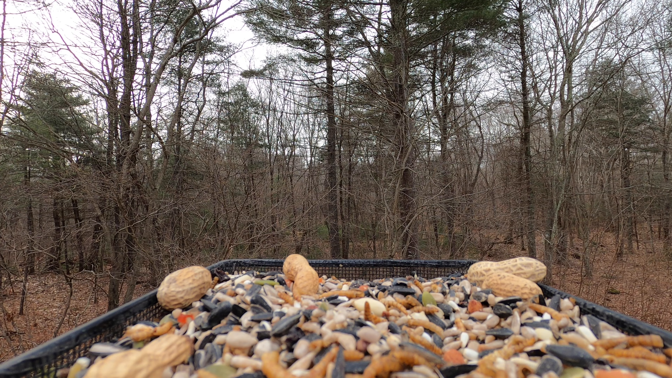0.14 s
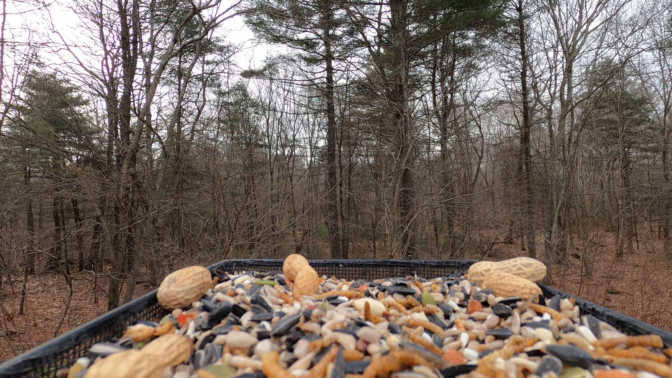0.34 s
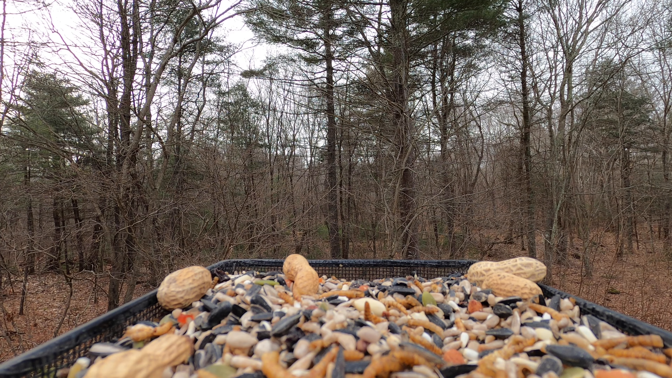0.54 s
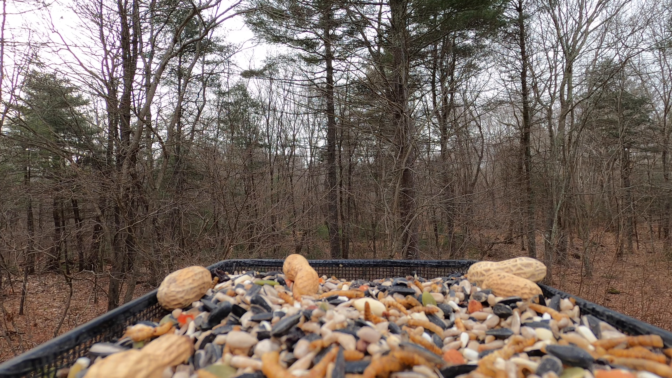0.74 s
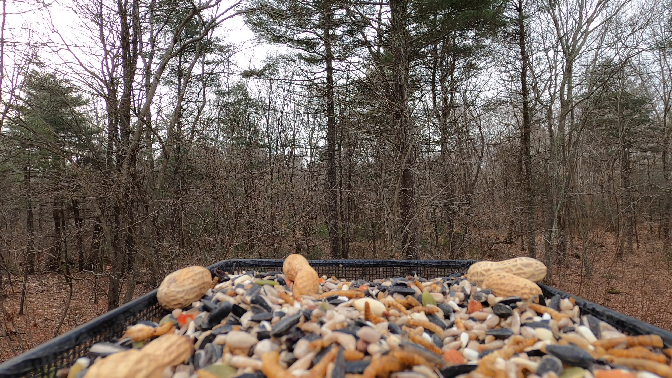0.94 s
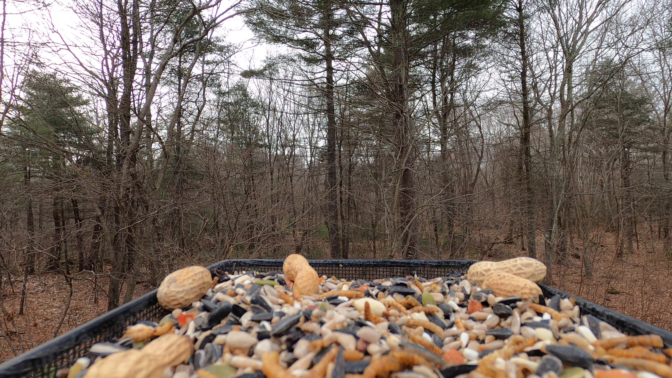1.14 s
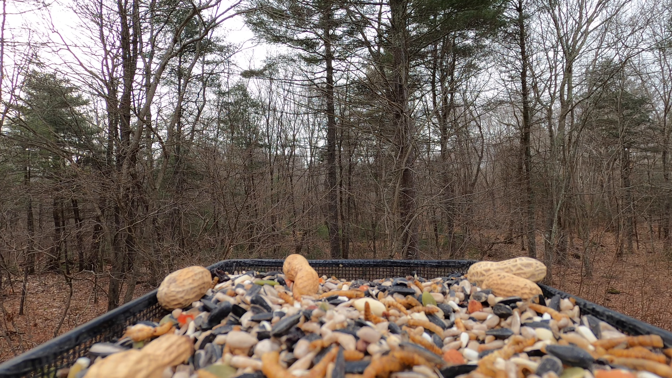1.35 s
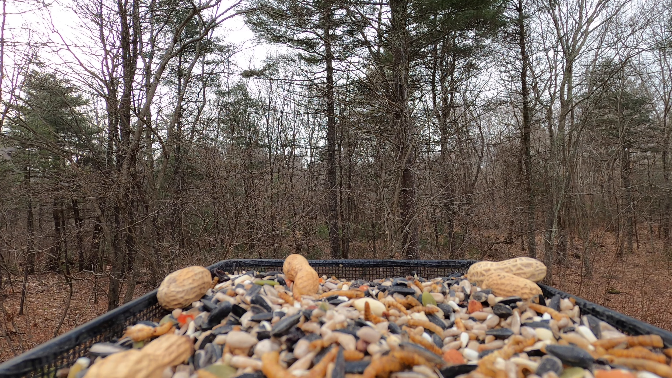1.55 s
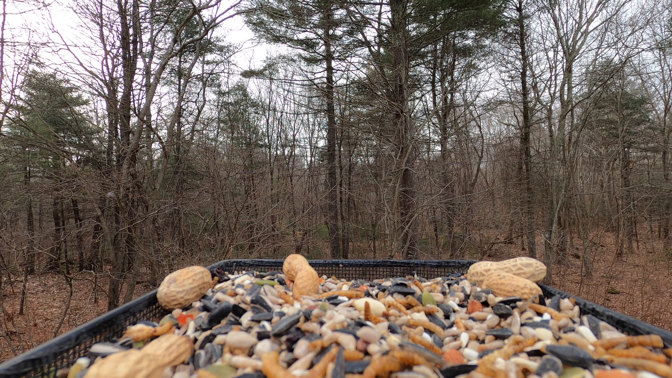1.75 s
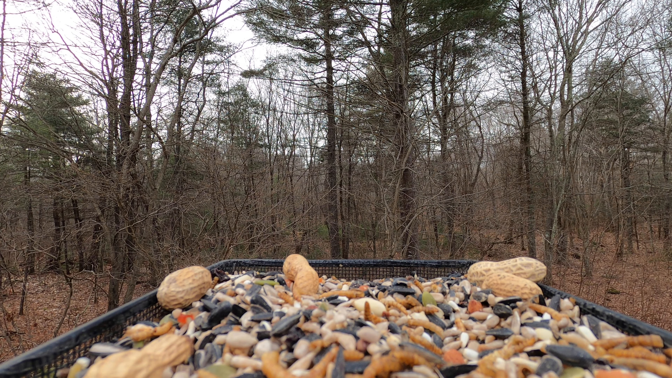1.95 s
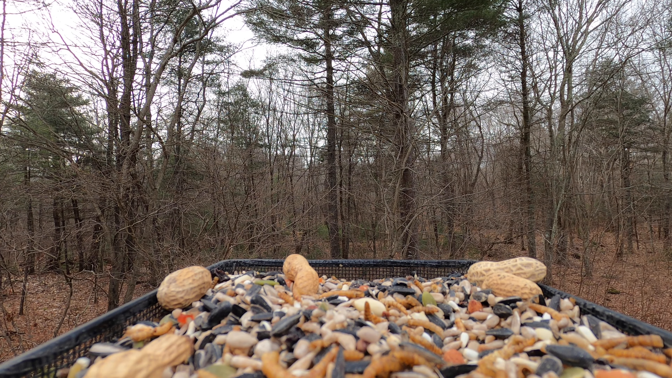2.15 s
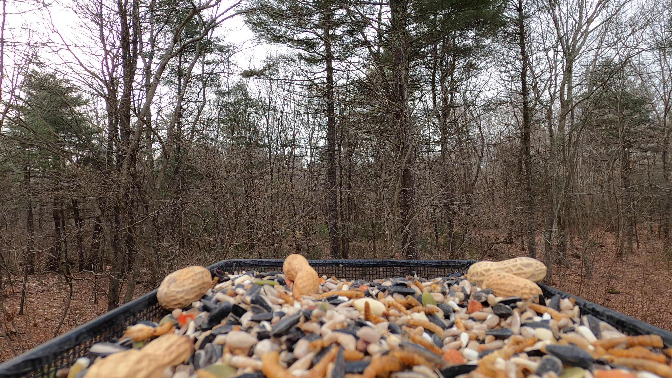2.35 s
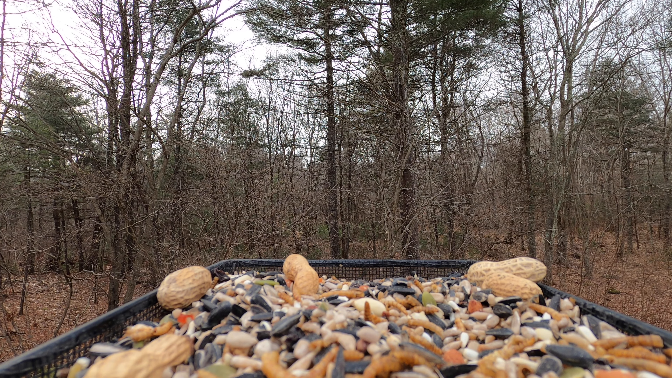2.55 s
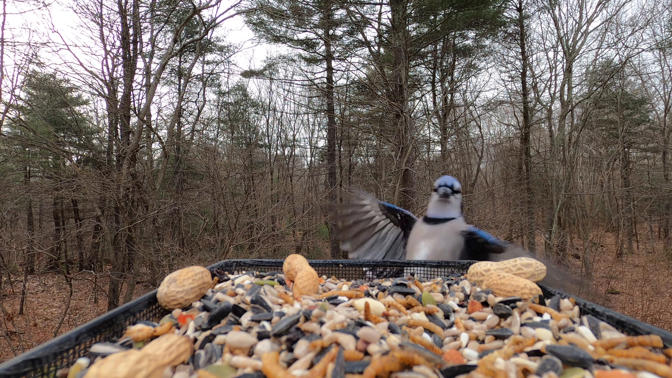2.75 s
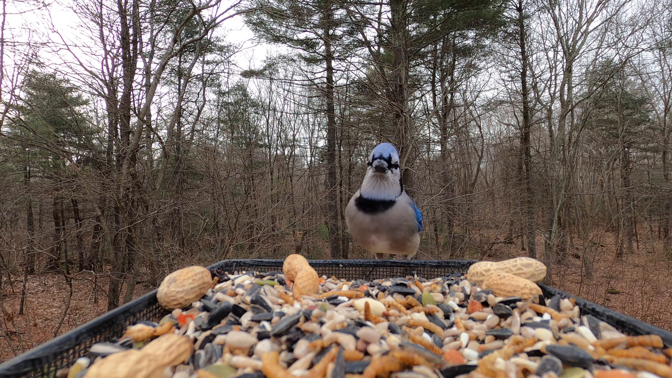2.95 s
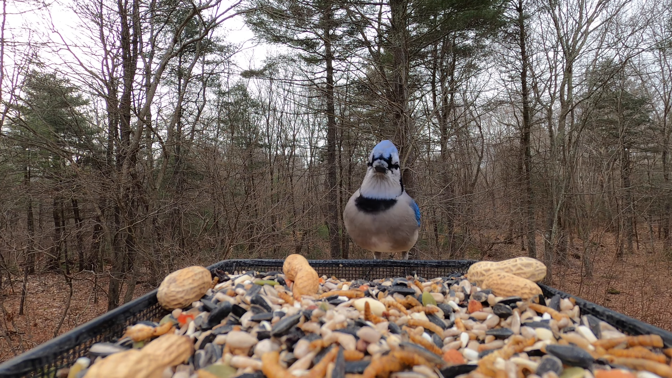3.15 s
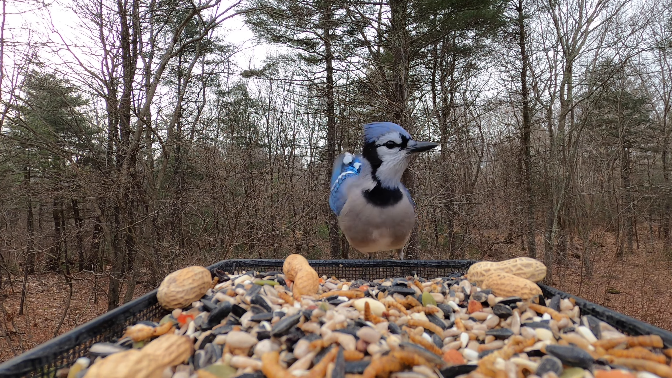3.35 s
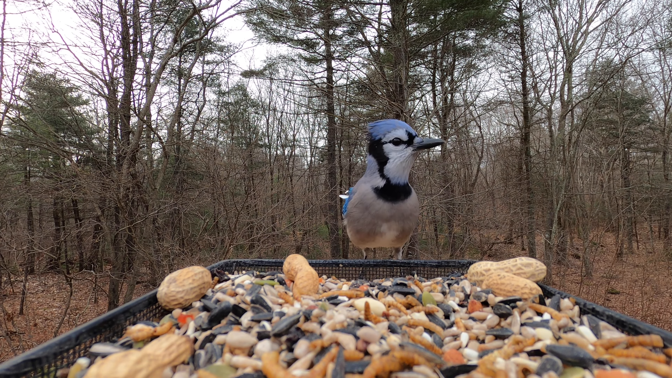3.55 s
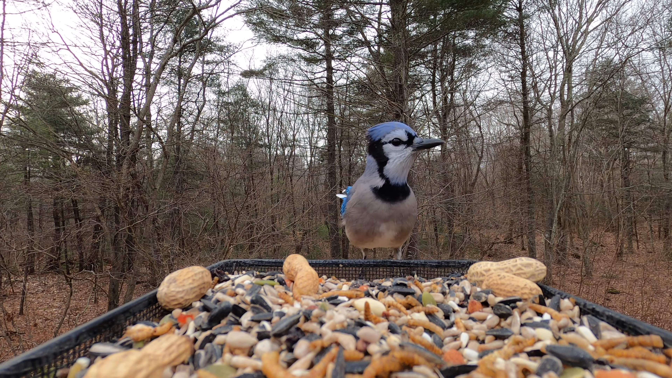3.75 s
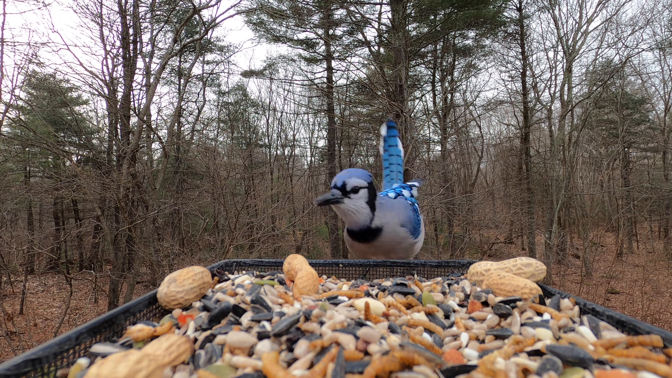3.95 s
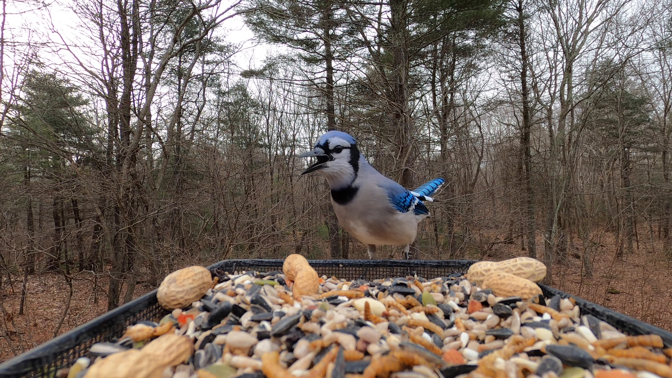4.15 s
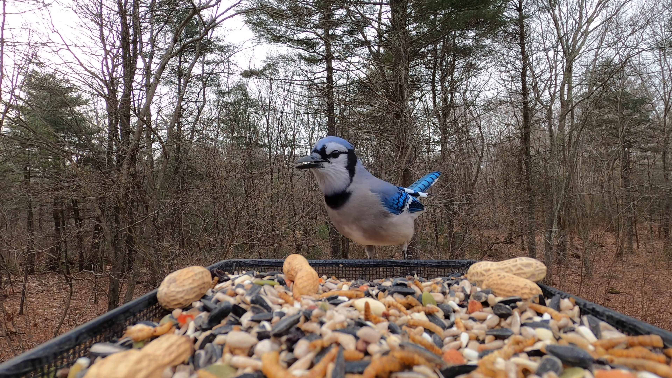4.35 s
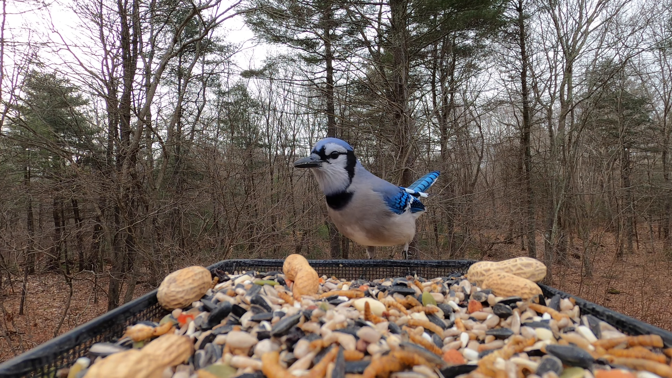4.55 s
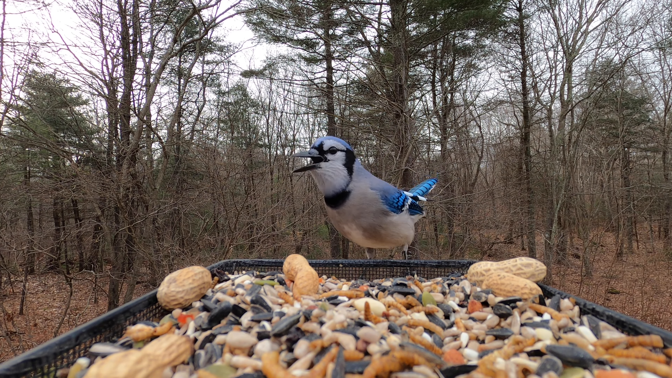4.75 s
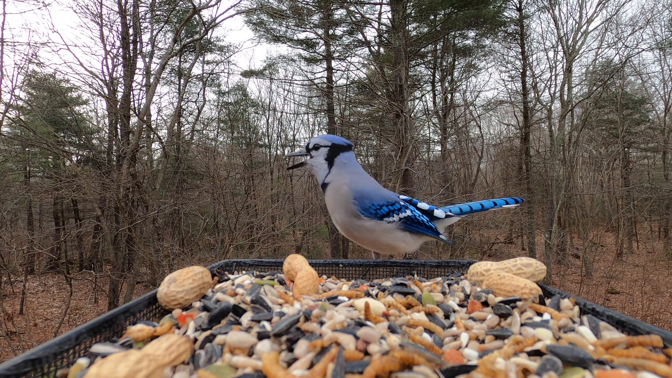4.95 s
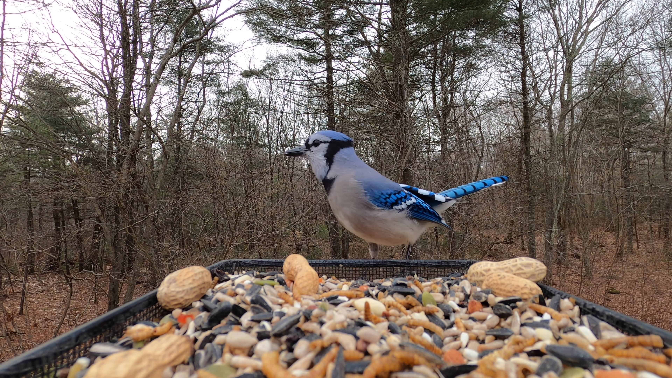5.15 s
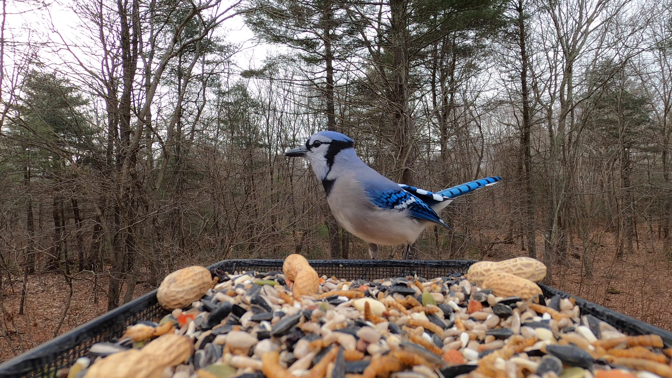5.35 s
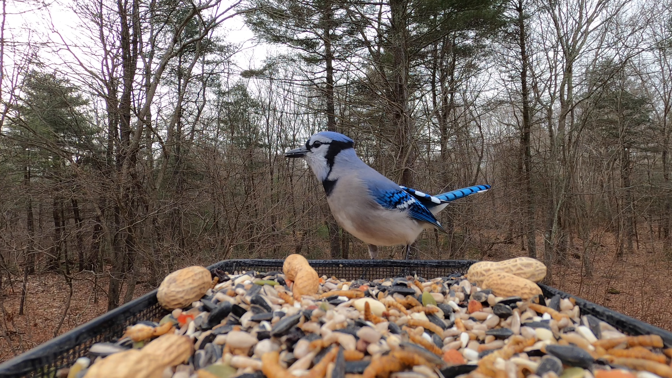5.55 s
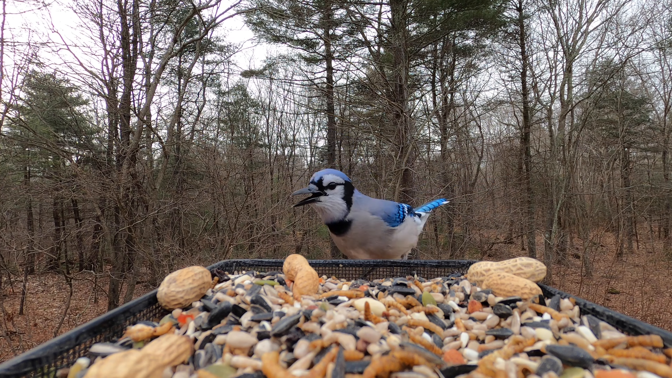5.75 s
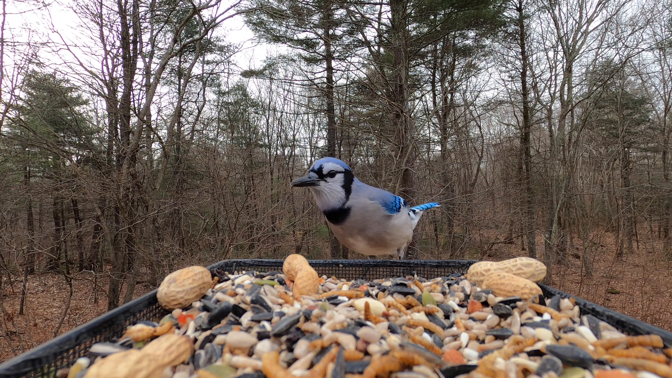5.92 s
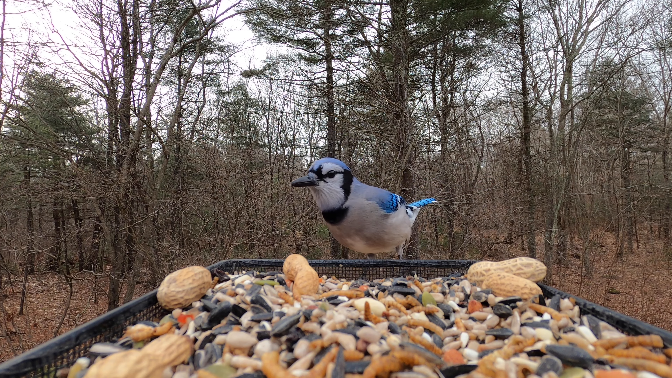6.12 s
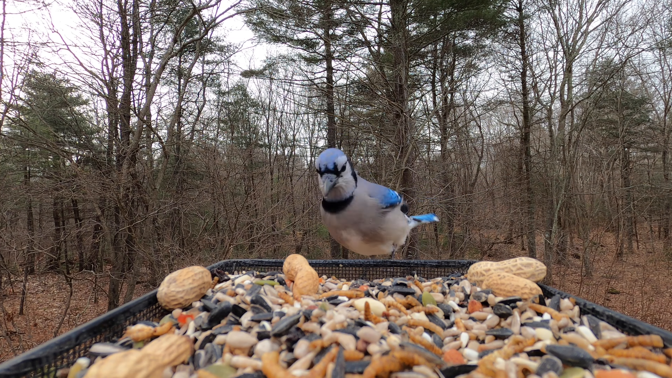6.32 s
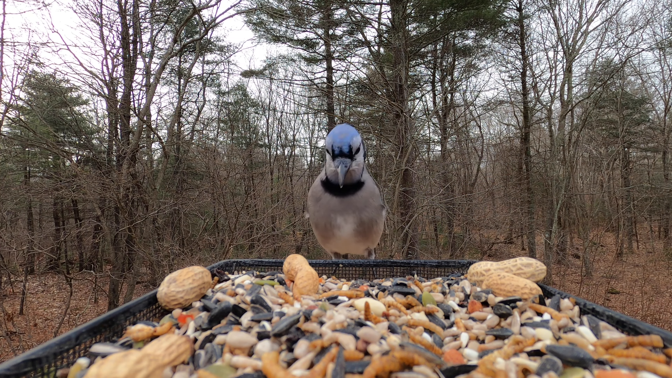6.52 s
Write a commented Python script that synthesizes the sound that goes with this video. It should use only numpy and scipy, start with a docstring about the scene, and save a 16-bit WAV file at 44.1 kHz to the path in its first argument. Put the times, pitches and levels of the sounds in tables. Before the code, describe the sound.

The scene opens in quiet woods: soft airy hush, low puffs of wind, faint leaf stirs and a distant engine idling as a low throbbing hum. A barely audible chirp comes at 0.8 s, a very thin high note at 1.1, then four quick, sharp high chirps from 1.9 to 2.25, slightly left. Around 2.55 wings approach softly; at 2.8 the jay lands with a burst of feather flutter, a dull thud and rattling claws and seeds, settling by 3.0. Dry wing flicks follow at 3.4 and 3.95. At 4.1, 4.8 and 5.7 it gives three explosive calls, each about a quarter second: raspy upward croak, short piercing whistle, harsh arched jeer, with a faint scattered echo from the trees. Small claw taps and soft flicks occur between them. At 6.4 the feathers rustle again with light taps and a faint chirp over the low hum.

```python
"""Soft woodland air, puffs of wind and a far idling engine open the scene; thin chirps follow from the trees.
A jay lands on a seed tray, flicks its wings and gives three loud calls: rasping rise, whistle, arched jeer.
Its voice is a sum of harmonics coloured by the throat, shaken and mixed with hiss where it is rough.
The tray is a set of decaying modes; wings, leaves and wind are shaped noise; the engine is a row of orders.
Scattered echoes answer the birds, and a gain control ducks under the loud sound."""
import sys
import numpy as np
from scipy import signal
from scipy.fft import rfft, irfft
from scipy.io import wavfile
from scipy.ndimage import uniform_filter1d

SR = 44100
rng = np.random.default_rng(int(sys.argv[2]) if len(sys.argv) > 2 else 0)


def generate_wav(signal):
    """Clip the signal to [-1, 1] and save it as 16-bit WAV at the path in sys.argv[1]."""
    frames = np.transpose(np.atleast_2d(signal))
    scaled = np.clip(frames, -1, 1) * 32767
    pcm = np.round(scaled).astype(np.int16)
    wavfile.write(sys.argv[1], SR, pcm)


N = 294588
TIME = np.arange(N) / SR
FREQS = np.fft.rfftfreq(N, 1 / SR)

# Rasping rise that opens each call. Each row: start in s, length in s, top pitch in Hz, full level in dB.
RISES = [(4.12, .079, 1485, -10.5), (4.797, 0.071, 1520, -8.5), (5.679, .069, 1491, -11)]
# Whistle in the middle of each call. Each row: start in s, length in s, pitch in Hz,
# sag as a share of the pitch, level in dB, opening accent in dB.
WHISTLES = [(4.197, 0.069, 2390, .02, -12, 3), (4.865, .070, 2385, .04, -18.5, 10),
            (5.745, .073, 2356, 0.055, -18.5, 7.5)]
# Arched jeer that ends each call. Each row: start in s, length in s, top pitch in Hz,
# sag as a share of the pitch, level in dB, fade over the note in dB.
JEERS = [(4.267, .100, 1250, -.005, -12, -3), (4.936, 0.1, 1250, 0.031, -9.5, 2.5),
         (5.82, 0.1, 1218, .015, -12, -0.5)]
# Throat and beak resonance in each note. Each row: frequency in Hz, relative level in dB.
RISE_COLOUR = [(500, -7.5), (1000, -6.5), (1450, -2.5), (1850, 7), (2300, -9), (2900, -3.5), (3400, -12),
               (4200, 0), (5800, -7), (7100, -18), (8600, -22.5), (10200, -32), (11200, -46),
               (15000, -52.5)]
WHISTLE_COLOUR = [(1800, -5.5), (2400, -9.5), (4100, -2.5), (4750, 2), (6000, -8.5), (7100, -12),
                  (9400, -30.5), (11800, -44.5), (15000, -56.5)]
JEER_COLOUR = [(850, -9), (1220, -1.5), (1900, -4), (2420, 2), (3100, -22), (3700, -3.5), (4900, -1.5),
               (6100, -4.5), (7300, -18), (8600, -20), (9800, -32), (11000, -38), (12300, -36.5),
               (15000, -53.5)]
# Turbulence in the throat. Each row: frequency in Hz, relative level in dB.
RASP_COLOUR = [(500, -25.5), (1500, -5), (3000, -14), (4400, 9), (5800, 1), (8500, -5), (10500, -25.5),
               (15000, -31)]
# Left-over-right level of the jay's position. Each row: frequency in Hz, difference in dB.
JAY_BALANCE = [(700, -2), (2400, 0), (4400, -3), (6000, 0.5), (7400, -2), (9000, -4.5), (15000, -7.5)]
# Lag of the left ear behind the right. Each row: frequency in Hz, phase in radians.
JAY_LAG = [(300, 0.94), (1200, 0.42), (2400, .62), (4600, 0.97), (6000, 1.4), (7200, 1.5), (8700, 0.85),
           (15000, 1.3)]

# Claws on the tray. Each row: time in s, relative level in dB,
# brightness (tilt of the modes in dB per decade, and gain of the crunch in dB).
CLAW_TAPS = [(2.7757, -21, 5.5), (2.7785, -17, 1.5), (2.7848, -17.5, 2), (2.7935, -20.5, 3.5),
             (2.803, -29, -3), (2.824, -34.5, 7), (2.8384, -24.5, -14.5), (2.8609, -22, -12.5),
             (2.8702, -23.5, 4), (2.92, -30.5, -18), (2.9382, -33.5, -8.5), (2.9543, -27, 9.5),
             (4.217, -24, 4), (4.223, -27, 3.5), (5.116, -29.5, -1), (5.141, -35, -11), (5.764, -29.5, 6),
             (6.401, -34, 7), (6.454, -32.5, 10.5)]
# Modes of the tray. Each row: frequency in Hz, relative level in dB, 60 dB decay time in s.
TRAY_MODES = [(230, -19.5, 0.32), (610, -12, .03), (930, -14, 0.025), (1360, 5, 0.02), (1790, -1, 0.028),
              (2180, -6, 0.0081), (2630, -1.5, .012), (2890, -8.5, 0.0088), (3600, -4, .01),
              (3750, -15, .01), (5750, -9, .006), (6450, -9.5, 0.0057)]
# Crunch of seed, then flexing of the tray. Each row: frequency in Hz, relative level in dB.
CRUNCH_COLOUR = [(200, -4.5), (700, -9.5), (1400, -1), (2800, 6.5), (6500, -3.5), (9000, -17.5),
                 (15000, -32)]
THUD_COLOUR = [(120, -12), (250, 0), (600, -2.5), (1200, -6), (2000, -25), (15000, -65.5)]
# Wing strokes of the landing. Each row: middle in s, half length in s,
# level of swept air in dB, level of feather friction in dB.
WINGBEATS = [(2.55, 0.073, -57, -67.5), (2.667, .012, -54.5, -50), (2.733, 0.028, -56.5, -50.5),
             (2.79, 0.01, -38.5, -31.5), (2.845, .034, -44, -47), (2.949, 0.011, -51, -45.5)]
# The perched jay flicks its wings open and shut. Each row: start in s, time open in s,
# opening level in dB, shutting level in dB, level of swept air in dB.
FLICKS = [(3.38, .05, -44.5, -39.5, -64), (3.939, .06, -40.5, -46, -62.5), (5.116, .025, -52, -51.5, -57),
          (5.455, 0.024, -61, -58.5, -50.5), (6.404, .053, -45.5, -49, -43)]
# Feather friction, then swept air. Each row: frequency in Hz, relative level in dB.
FEATHER_COLOUR = [(150, 16), (600, -11), (1400, 2.5), (2200, -4), (3500, -5.5), (7000, -11.5),
                  (10000, -24.5), (15000, -45)]
WING_COLOUR = [(100, -21.5), (230, 10.5), (400, -5.5), (600, -13), (950, -13), (1350, -1.5), (1750, -6.5),
               (2200, -26.5), (5000, -45), (15000, -41)]

# Small birds, and a distant bird's thin note. Each row: start in s, length in s, top pitch in Hz,
# level in dB, left-over-right level in dB.
TSIPS = [(.788, 0.046, 7450, -58, 4), (1.888, .071, 7690, -44.5, 4.5), (1.994, 0.049, 7680, -41, 4.5),
         (2.098, 0.045, 7650, -44.5, 4.5), (2.192, 0.053, 7700, -44.5, 3.5), (6.447, 0.058, 7260, -58, 9)]
SEETS = [(1.112, .095, 8860, -49.5, -5.5)]
FAR_WHISTLES = [(0.0025, .19, 5940, -79, -3)]
# Their contours. Each row: share of the length, share of the top pitch, relative level in dB.
TSIP_SHAPE = [(0, .83, -16), (.15, .89, -1), (.47, .955, 0), (.78, 1, 0), (.87, .92, -9), (.94, .75, -17),
              (1, .6, -28)]
SEET_SHAPE = [(0, .94, -10), (.16, .98, 6), (.45, .965, -2), (.72, 1, 9.5), (0.851, .94, 9.5),
              (.92, 0.61, 5.5), (1, 0.14, -24)]
FAR_SHAPE = [(0, 1, 0), (.4, 1, -2), (1, .995, -8)]

# Distant leaves stir. Each row: middle in s, half length in s, level in dB.
LEAVES = [(.1, 0.027, -72), (.42, .012, -67), (.65, .2, -73.5), (.9, .007, -67), (.945, 0.0046, -64),
          (1.1, 0.097, -62.5), (1.6, 0.033, -65.5), (2.52, 0.12, -71.5)]
# Spectrum of the leaves. Each row: frequency in Hz, relative level in dB.
LEAF_COLOUR = [(1000, 9.5), (2500, -8), (4500, -1.5), (7000, -6.5), (10000, -19.5), (15000, -34)]
# Idling engine. Each row: multiple of the cycle rate, relative level in dB.
ENGINE_ORDERS = [(8, 0), (10, -13), (13, -11), (14, -10), (15, -8), (16, -7), (17, -14), (18, -16),
                 (20, -16), (22, -16), (25, -17), (26, -16), (29, -18), (34, -21)]
# Air of the woods. Each row: frequency in Hz, relative level in dB.
WOODS_COLOUR = [(12, 4), (40, 3.5), (90, -14.5), (130, -18.5), (200, -10), (310, -20.5), (500, -24),
                (780, -29.5), (1300, -28.5), (2000, -38), (3000, -45.5), (7000, -53), (9000, -61.5),
                (11000, -75.5), (15000, -69.5)]
# Breeze in the woods. Each row: time in s, relative level in dB.
BREEZE = [(0.0, -65.5), (0.41, -70), (0.64, -66), (2.0, -69.5), (2.25, -68.5)]
# Puffs of wind on the microphone. Each row: middle in s, half length in s, relative level in dB.
PUFFS = [(.15, 0.15, -41), (.8, 0.4, -45), (1.33, 0.075, -38.5), (2.8, 0.06, -49.5)]
# Spectrum of the puffs. Each row: frequency in Hz, relative level in dB.
PUFF_COLOUR = [(12, -5.5), (30, -3), (70, -2.5), (120, -13), (250, -25.5), (600, -62), (15000, -100)]

CROAK_FROM_HZ, CROAK_TO_HZ = 490, 944   # the rise starts as a low croak
UPPER_S = 0.046   # then flips to the upper register for this long
CLIMB_SHARE, CLIMB_S = .22, .017   # landing this far under its top pitch and closing in on it
SWELL_DB, SWELL_PAST_FLIP_S = 20, 0.0059   # the voice swells until just after the flip
PUSH_DB = 9   # and gains this much besides over the whole note
ACCENT_AT_S, ACCENT_WIDTH_S = 0.006, .012
JEER_SCOOP, JEER_SCOOP_S = .12, .009   # the jeer scoops up from this share below its pitch
JEER_DROP, JEER_DROP_S = .31, .011   # and falls away as the bird lets go
FULL_VOICE_DB = -11   # level from which the jay's voice is brightest
THROAT_SPREAD = 0.95   # the throat smears each pulse in time (radians)
CALM_FRAY = 0.0026   # phase wander of the second harmonic in the clear voice, steeper above (radians)
CUTOFF_HZ = 15700
CONTACT_S = .00015   # a claw needs this long to set the tray ringing
SEEDS_PER_TAP, SEED_DELAY_S, SEED_LOSS_DB = 2, .005, 11.5   # mean gap and loss from each seed to the next
THUD_LAG_S = 0.0046   # lag of the bending waves at 1 kHz; the lower, the slower
FLICK_HALF_S, SLIDE_DB = .005, -7.5   # snaps are short; the feathers slide more softly in between
NEAR_SIDE_DB, FAR_SIDE_DB = -10, -6   # opposed part of the stereo noise, near and far
CYCLE_HZ = 5.665   # mean engine cycle rate
ENGINE_SPREAD = .3   # phase offset at each ear (radians)
LIMIT_DB, LIMIT_SENSE_S, LIMIT_ATTACK_S, RECOVER_DB_PER_S = -18, 0.026, .006, 4.5   # gain control


def jay():
    """Register breaks: three kinds of note follow one another and overlap briefly at each break."""
    rise = jay_note([rise_contour(*row) for row in RISES], RISE_COLOUR,
                    jitter=0.012, flutter=0.27, flutter_hz=272.7, fray=0.65,
                    hiss_db=-16, calm_hiss_db=-31.5, half_db=-8.0, dulling=1.0)
    # the whistle holds its pitch fairly well even where it is rough
    whistle = jay_note([whistle_contour(*row) for row in WHISTLES], WHISTLE_COLOUR,
                       jitter=.035, flutter=.4, flutter_hz=436.6, fray=0.53,
                       hiss_db=-6, calm_hiss_db=-32.5, half_db=-23.5, dulling=.2)
    jeer = jay_note([jeer_contour(*row) for row in JEERS], JEER_COLOUR,
                    jitter=0.041, flutter=.25, flutter_hz=378, fray=0.69,
                    hiss_db=-7.5, calm_hiss_db=-47, half_db=-20.0, dulling=.9)
    return rise + whistle + jeer


def rise_contour(start, length, top_hz, level_db):
    """Register flip: a croak climbs, jumps up with a burst of rasp, then clears; rows of (s, Hz, dB, rasp)."""
    t = TIME[TIME < length]
    flip = length - UPPER_S
    croak = CROAK_FROM_HZ + (CROAK_TO_HZ - CROAK_FROM_HZ) * t / flip
    upper = top_hz * (1 - CLIMB_SHARE * np.exp(-(t - flip) / CLIMB_S))
    hz = np.where(t < flip, croak, upper)
    breaking = np.exp(-(length - t) / .004)
    swell_db = SWELL_DB * np.maximum(1 - t / (flip + SWELL_PAST_FLIP_S), 0)
    db = level_db - swell_db - PUSH_DB * (1 - t / length) - 4.5 * breaking
    burst = .5 * bump(t - flip, middle_s=0.011, width_s=0.0096)
    rasp = np.where(t < flip, .22, .09) + burst + 0.19 * breaking
    return np.column_stack([start + t, hz, db, rasp])


def whistle_contour(start, length, pitch_hz, sag, level_db, accent_db):
    """Unstable oscillation at the breaks: the voice starts accented and rough, sags, then collapses."""
    t = TIME[TIME < length]
    breaking, collapse = np.exp(-t / .0035), np.exp(-(length - t) / 0.0067)
    hz = pitch_hz * (1 - sag * t / length) * (1 - .2 * collapse + .025 * breaking)
    accent = accent_db * bump(t, ACCENT_AT_S, ACCENT_WIDTH_S)
    db = level_db + accent - 6 * breaking - 2.5 * collapse
    rasp = 0.037 + 0.33 * np.exp(-t / .011) + .7 * collapse
    return np.column_stack([start + t, hz, db, rasp])


def jeer_contour(start, length, top_hz, sag, level_db, fade_db):
    """Pitch and level arch together; the oscillation is clean except as it catches and lets go."""
    t = TIME[TIME < length]
    attack, release = np.exp(-t / 0.0056), np.exp(-(length - t) / 0.0086)
    scoop = JEER_SCOOP * np.exp(-t / JEER_SCOOP_S)
    drop = JEER_DROP * np.exp(-(length - t) / JEER_DROP_S)
    hz = top_hz * (1 - sag * t / length - scoop - drop)
    db = level_db - fade_db * t / length - 17 * attack - 20.5 * release
    rasp = .012 + .3 * attack + .17 * release
    return np.column_stack([start + t, hz, db, rasp])


def jay_note(contours, colour, jitter, flutter, flutter_hz, fray, hiss_db, calm_hiss_db, half_db, dulling):
    """Source and filter: the throat weights the syrinx's harmonics; rasp shakes their pitch and strength."""
    out = np.zeros(N)
    shake, throb, hiss = wobble(500), wobble(flutter_hz), noise(RASP_COLOUR)
    k = np.arange(1, 17)[:, None]   # harmonic numbers
    for contour in contours:
        start, end = contour[:, 0].min(), contour[:, 0].max()
        near = (TIME > start - .01) & (TIME < end + .01)
        t = TIME[near]
        hz, level_db, rasp = [rounded(c, span_s=0.0019) for c in columns_at(contour, t)]
        phase = 2 * np.pi * np.cumsum(hz * (1 + jitter * rasp * shake[near])) / SR
        # the upper harmonics sink when the bird eases off
        ease_db = np.minimum(level_db - FULL_VOICE_DB, 0)
        gains = from_db(at_hz(colour, k * hz) + dulling * ease_db * np.log10(k)) * (k * hz < CUTOFF_HZ)
        # no two cycles are alike: the low harmonics hold, the high ones fray
        lowpass = signal.butter(2, 400, fs=SR, output="sos")
        chance = signal.sosfilt(lowpass, rng.standard_normal((len(k), len(t))))
        slip = (fray * rasp + CALM_FRAY * (k - 1)) * (k - 1) * rms_one(chance)
        partials = np.sin(k * phase + THROAT_SPREAD * k ** 2 + slip)
        tone = np.sum(gains * partials, axis=0) / np.sqrt(np.sum(gains ** 2, axis=0) / 2)
        # strong and weak cycles alternate in the rasp, adding a line between the first two harmonics
        tone = tone + from_db(half_db) * rasp * np.sin(1.5 * phase)
        # the two sides of the syrinx beat against each other where the voice is rough
        beat = np.sin(2 * np.pi * flutter_hz * t) + .5 * throb[near]
        hiss_gain = from_db(hiss_db) * rasp + from_db(calm_hiss_db)
        air = hiss_gain * hiss[near] * (1 + np.sin(phase) / 2)   # each cycle pulses the breath
        envelope = from_db(level_db) * gate(t, start, end, fade_s=0.0081)
        out[near] += (tone + air) * (1 + flutter * rasp * beat) * envelope
    return out


def on_feeder(x):
    """Interaural differences: level and phase against frequency place the jay a little to the right."""
    late = np.exp(-.5j * at_hz(JAY_LAG, FREQS) * np.array([[1], [-1]]))
    return irfft(rfft(x) * pan(at_hz(JAY_BALANCE, FREQS)) * late, N)


def touches():
    """Secondary impacts: every claw tap knocks seeds loose, which drop back soon after, ever more softly."""
    delays = SEED_DELAY_S * np.cumsum(rng.uniform(.5, 1.5, (len(CLAW_TAPS), SEEDS_PER_TAP)), axis=1)
    seeds = []
    for (s, level_db, bright_db), row in zip(CLAW_TAPS, delays):
        for k, delay in enumerate(row):
            seeds.append((s + delay, level_db - SEED_LOSS_DB * (k + 1), bright_db))
    return CLAW_TAPS + seeds


def tray(ring_db, crack_db, crack_s, detune):
    """Modal ringing: each touch excites the modes a little differently, under a short crunch."""
    out, clicks, t = np.zeros(N), np.zeros(N), TIME[:SR // 8]
    hz, mode_db, t60 = np.transpose(TRAY_MODES)[:, :, None]
    signs = (-1) ** np.arange(len(TRAY_MODES))[:, None]
    hits = touches()
    chances = rng.standard_normal((len(hits), 2, len(TRAY_MODES), 1))
    for (s, level_db, bright_db), (strength, shift) in zip(hits, chances):
        at = round(s * SR)
        tilt_db = bright_db * np.log10(hz / 1400)
        gains = from_db(level_db + mode_db + ring_db + tilt_db + 2 * strength)
        decay = from_db(-60 * t / t60)
        rings = signs * gains * np.sin(2 * np.pi * hz * (1 + detune * shift) * t) * decay
        out[at:at + len(t)] += (rings.sum(axis=0) * (1 - np.exp(-t / CONTACT_S)))[:N - at]
        clicks[at] = from_db(level_db + bright_db + crack_db)
    crunch = signal.lfilter([1], [1, -np.exp(-1 / (crack_s * SR))], clicks + 1e-18)
    return out + lagged(crunch, CONTACT_S) * wide_noise(CRUNCH_COLOUR, side_db=NEAR_SIDE_DB)


def thuds(thud_db):
    """Dispersion of bending waves: the low part of each tap arrives last, so the thud falls in pitch."""
    pushes = np.zeros(N)
    for s, level_db, _ in CLAW_TAPS:
        pushes[round(s * SR)] = from_db(level_db + thud_db)
    slow = np.exp(-4j * np.pi * THUD_LAG_S * np.sqrt(1000 * FREQS))
    return irfft(rfft(pushes) * from_db(at_hz(THUD_COLOUR, FREQS)) * slow, N)


def wings():
    """Friction and flow noise: in strokes and flicks, feathers rub and air is swept aside."""
    friction = [(s, half, db) for s, half, _, db in WINGBEATS]
    swept = [(s, half, db) for s, half, db, _ in WINGBEATS]
    for s, length, open_db, shut_db, air_db in FLICKS:
        friction.append((s, FLICK_HALF_S, open_db))
        friction.append((s + length / 2, length / 2, open_db + SLIDE_DB))
        friction.append((s + length, FLICK_HALF_S, shut_db))
        swept += [(s, FLICK_HALF_S, air_db), (s + length, FLICK_HALF_S, air_db)]
    feathers = rustle(friction, FEATHER_COLOUR, grain_db=3.0, side_db=NEAR_SIDE_DB)
    return feathers + rustle(swept, WING_COLOUR, grain_db=5.5, side_db=NEAR_SIDE_DB)


def chirps(events, shape):
    """Frequency modulation: near-pure whistles whose pitch and level follow a contour."""
    out, waver = np.zeros((2, N)), 1 + 0.0051 * wobble(250)
    for start, length, top_hz, level_db, balance_db in events:
        near = (TIME > start - .005) & (TIME < start + length + .005)
        t = TIME[near]
        pitch, shape_db = columns_at(shape, (t - start) / length)
        hz = top_hz * rounded(pitch, span_s=0.001) * waver[near]
        tone = np.sqrt(2) * np.sin(2 * np.pi * np.cumsum(hz) / SR)
        envelope = from_db(level_db + shape_db) * gate(t, start, start + length, fade_s=0.00091)
        out[:, near] += pan(balance_db) * tone * envelope
    return out


def scattered_echo(x, t60, wet_db, build_s, thin_hz, dull_hz):
    """Diffuse scattering: obstacles return the sound as a thin decaying tail, different at each ear."""
    t = TIME[:2 * SR]
    scatter = rng.standard_normal((2, len(t))) * from_db(3.8 * rng.standard_normal(len(t)))
    tail = scatter * from_db(-60 * t / t60) * (1 - np.exp(-t / build_s))
    tail /= np.sqrt(np.sum(tail ** 2, axis=1, keepdims=True))
    echo = signal.fftconvolve(x * np.ones((2, 1)), tail, axes=1)[:, :N]
    thinning = FREQS / np.hypot(FREQS, thin_hz)
    dulling = np.sqrt(1 + (FREQS / dull_hz) ** 4)
    return from_db(wet_db) * irfft(rfft(echo) * thinning / dulling, N)


def rustle(strokes, colour, grain_db, side_db):
    """Noise of many small contacts: bell-shaped swells add in power over a grainy noise."""
    power = sum(from_db(2 * db) * bump(TIME, s, half) for s, half, db in strokes)
    grain = rms_one(from_db(grain_db * wobble(420)))
    return np.sqrt(power) * grain * wide_noise(colour, side_db)


def engine(throb_s):
    """Engine orders: eight firings a cycle; uneven cylinders add other orders that swell once a cycle."""
    cycles = np.cumsum(CYCLE_HZ * (1 + .004 * wobble(1))) / SR - throb_s * CYCLE_HZ
    multiples, level_db = np.transpose(ENGINE_ORDERS)
    offsets = rng.normal(0, .17, len(multiples))
    # each order reaches the two ears by paths of its own
    paths = ENGINE_SPREAD * rng.choice([-1, 1], len(multiples))
    orders = np.zeros((2, N))
    for k, db, offset, path in zip(multiples, level_db, offsets, paths):
        orders += from_db(db) * np.sin(2 * np.pi * (k * cycles + offset) + path * np.array([[1], [-1]]))
    return rms_one(orders * from_db(.8 * wobble(6)))


def background(engine_db, rumble_db, gust_db, air_db, split_hz):
    """Broadband ambience: engine and rumble under the rush of the woods; wind leans to the right."""
    breeze_db, = columns_at(BREEZE, TIME)
    woods = rfft(wide_noise(WOODS_COLOUR, side_db=FAR_SIDE_DB))
    low_share = 1 / (1 + (FREQS / split_hz) ** 4)
    rumble, air = irfft(woods * low_share, N), irfft(woods * (1 - low_share), N)
    idling = from_db(engine_db) * engine(throb_s=0.12)
    buffeted = from_db(rumble_db + gust_db * wobble(1.3)) * rumble   # light air buffets in lumps
    wind = pan(-7.5) * rustle(PUFFS, PUFF_COLOUR, grain_db=0, side_db=-6)
    return pan(0.8) * (idling + buffeted + from_db(breeze_db + air_db) * rms_one(air)) + wind


def gain_control(x):
    """Level-dependent gain: it ducks under loud sound and creeps back."""
    level_db = 10 * np.log10(lagged(np.mean(x ** 2, axis=0), LIMIT_SENSE_S) + 1e-12)
    recovery = RECOVER_DB_PER_S * TIME
    cut_db = np.maximum.accumulate(np.maximum(level_db - LIMIT_DB, 0) + recovery) - recovery
    return x * from_db(-lagged(cut_db, LIMIT_ATTACK_S))


def from_db(db):
    """Decibels to amplitude gain."""
    return 10 ** (np.asarray(db) / 20)


def rms_one(x):
    """Scale to unit rms."""
    return x / np.sqrt(np.mean(x ** 2) + 1e-20)


def columns_at(rows, t):
    """Columns of a curve, joined by straight lines."""
    s, *columns = np.transpose(rows)
    return [np.interp(t, np.sort(s), c) for c in columns]


def at_hz(points, hz):
    """Read a spectrum on a log-frequency axis."""
    f, value = np.transpose(points)
    return np.interp(np.log(np.maximum(hz, 1)), np.log(f), value)


def wobble(rate_hz):
    """Low-passed chance: a smooth random curve of unit rms."""
    return rms_one(irfft(rfft(rng.standard_normal(N)) / (1 + (FREQS / rate_hz) ** 4), N))


def noise(colour):
    """Filtered white noise: coloured, of unit rms."""
    return rms_one(irfft(rfft(rng.standard_normal(N)) * from_db(at_hz(colour, FREQS)), N))


def wide_noise(colour, side_db):
    """Partial correlation between the ears: a shared noise plus a weaker opposed one."""
    return noise(colour) + from_db(side_db) * noise(colour) * [[1], [-1]]


def pan(balance_db):
    """Left and right gains that differ by the balance."""
    return from_db(np.array([[1], [-1]]) * balance_db / 2)


def gate(t, start, end, fade_s):
    """Open between start and end, with soft edges."""
    return np.sin(np.pi / 2 * np.clip(np.minimum(t - start, end - t) / fade_s + .5, 0, 1)) ** 2


def rounded(curve, span_s):
    """Muscular inertia: corners of a contour are rounded by averaging twice."""
    size = max(int(span_s * SR), 1)
    return uniform_filter1d(uniform_filter1d(curve, size), size)


def bump(t, middle_s, width_s):
    """A bell-shaped swell of height 1."""
    return np.exp(-np.minimum(((t - middle_s) / width_s) ** 2, 50))


def lagged(x, lag_s):
    """First-order relaxation: follow a control with a one-pole lag."""
    r = np.exp(-1 / (lag_s * SR))
    return signal.lfilter([1 - r], [1, -r], x)


def scene():
    """Superposition: the jay close by, small birds and the engine far off."""
    calls = jay()
    small_birds = chirps(TSIPS, TSIP_SHAPE) + chirps(SEETS, SEET_SHAPE) + chirps(FAR_WHISTLES, FAR_SHAPE)
    landing = tray(ring_db=-9, crack_db=-11.0, crack_s=0.00088, detune=0.033) + thuds(thud_db=9.5)
    movement = pan(2.0) * on_feeder(landing + wings())
    leaves = rustle(LEAVES, LEAF_COLOUR, grain_db=3.5, side_db=FAR_SIDE_DB)
    # trunks return both the calls and the chirps
    echoes = scattered_echo(calls, t60=0.77, wet_db=-34.0, build_s=.012, thin_hz=2200, dull_hz=7000)
    echoes += scattered_echo(small_birds, t60=0.39, wet_db=-9.0, build_s=0.0016, thin_hz=500, dull_hz=10400)
    # the feeder and the ground answer first
    nearby = scattered_echo(calls, t60=0.11, wet_db=-22.5, build_s=0.0029, thin_hz=900, dull_hz=12000)
    far = background(engine_db=-39, rumble_db=-48.5, gust_db=3, air_db=6.0, split_hz=230)
    return on_feeder(calls) + small_birds + movement + leaves + echoes + nearby + far


def record(dry):
    """Band limiting: after the gain control and a short fade-in, the top is cut steeply."""
    opened = gain_control(dry) * gate(TIME, .002, np.inf, fade_s=.004)
    return signal.sosfilt(signal.ellip(10, .1, 80, CUTOFF_HZ, fs=SR, output="sos"), opened)


dry = scene()
out = record(dry)
generate_wav(out)
```